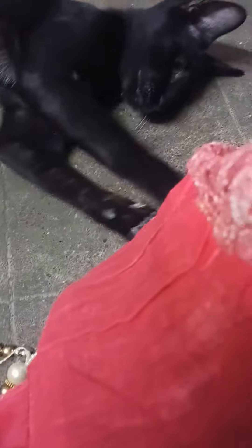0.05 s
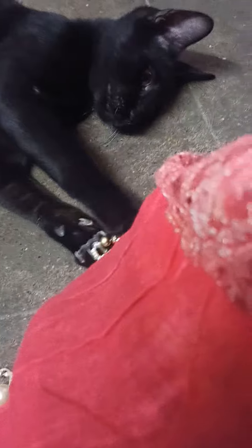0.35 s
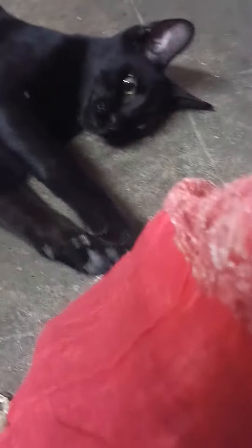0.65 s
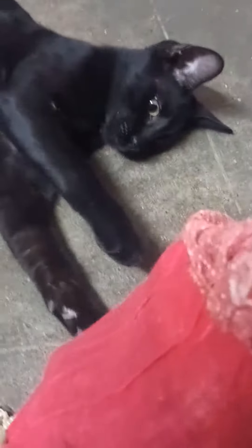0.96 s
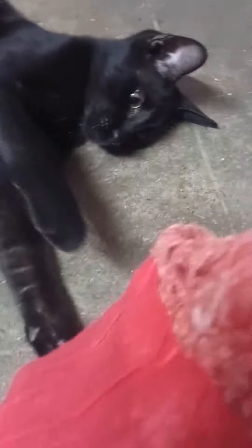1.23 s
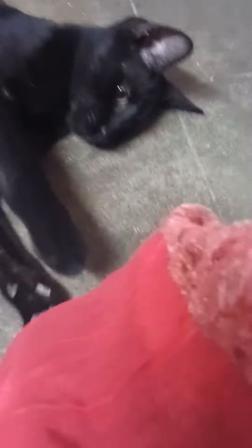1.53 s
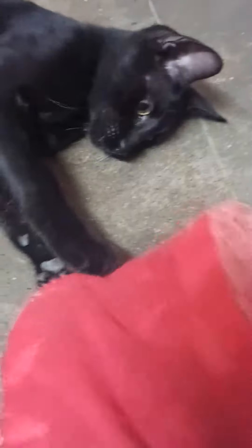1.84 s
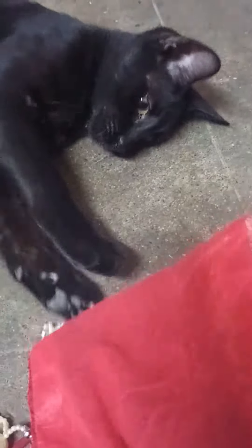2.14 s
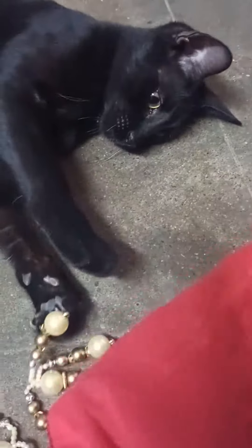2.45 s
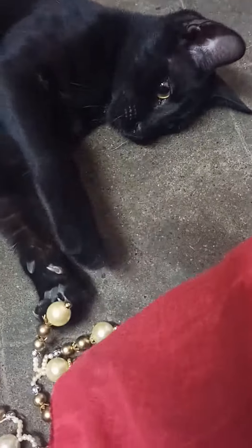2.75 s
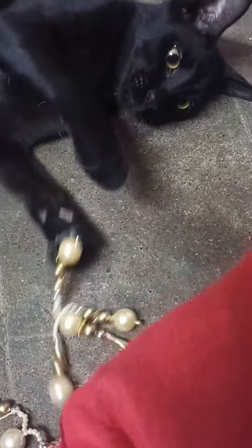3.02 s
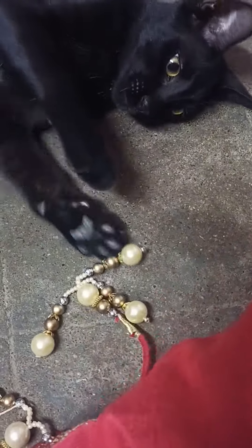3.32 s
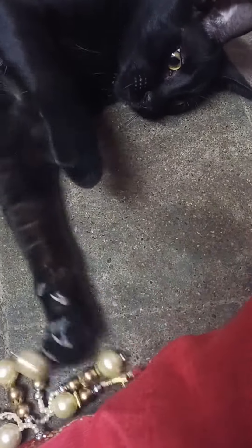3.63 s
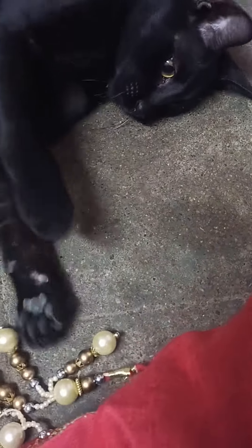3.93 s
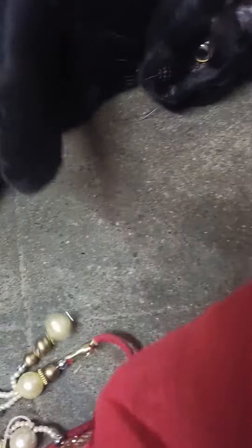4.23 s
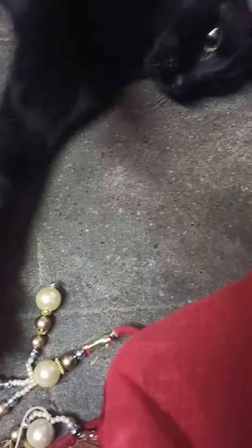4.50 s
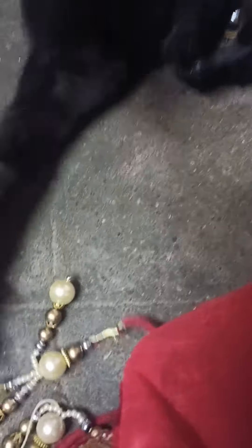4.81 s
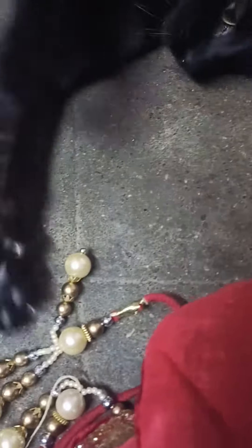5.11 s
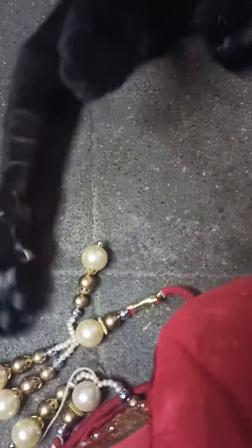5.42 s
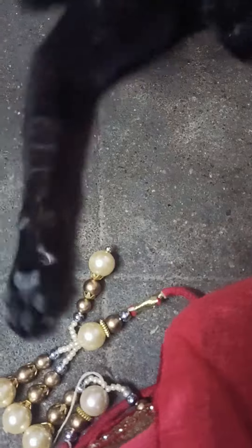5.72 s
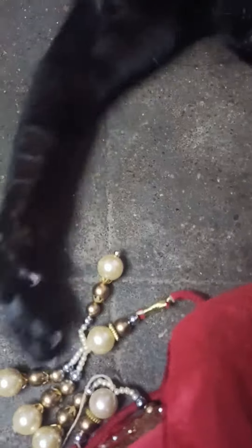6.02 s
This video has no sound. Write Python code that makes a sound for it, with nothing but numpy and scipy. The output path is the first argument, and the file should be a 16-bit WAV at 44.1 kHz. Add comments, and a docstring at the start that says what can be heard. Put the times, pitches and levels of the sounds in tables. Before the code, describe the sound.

A cat paws a beaded tassel on a stone floor, close to the microphone. Two tiny metal bells give short, high, slightly buzzing chinks at the very start, around 0.4 seconds and faintly at 0.9. Beads slide with a fine gritty scrape and click sharply together near 1.3 seconds, followed by the brightest jingles at 1.4 and 1.8 and a faint one at 2.3. After a lull, a flurry of small dry bead clicks and short drags runs from about 3.1 to 4.5 seconds, strongest near 3.5, 3.8 and 4.2, with one very faint bell touch at 4.4. Single clicks follow near 4.9 and 5.6, and a last click and slide at 6.2. Throughout, a ceiling fan rumbles and hums softly. Its faint ticking, about five a second, and a soft high hiss come up at around 1.4 seconds. The room adds only a slight, short echo.

```python
"""Two tiny metal bells jingle and beads click and slide as a cat paws a tassel on a stone floor, close by.
A loose pellet strikes each bell's shell and buzzes against it. The beads knock on the stone and on
each other, and catch on grit as they drag. Behind them a ceiling fan rumbles and ticks faintly once
a turn, under a soft hiss. Ticks and hiss are faint at first and come up at about 1.4 s."""
import sys
import numpy as np
from scipy import signal
from scipy.fft import rfft, irfft
from scipy.io import wavfile

SR = 44100
rng = np.random.default_rng(int(sys.argv[2]) if len(sys.argv) > 2 else 0)


def to_wav(sig):
    """Store sig (one row per channel, or 1-D mono) as 16-bit WAV at the path in sys.argv[1].

    Samples outside -1..1 are clipped; the rate is SR.
    """
    pcm = np.clip(np.atleast_2d(sig), -1, 1) * 32767
    pcm = np.round(pcm).astype(np.int16)
    wavfile.write(sys.argv[1], SR, pcm.T)  # frames by channels


N = 276066
T = np.arange(N) / SR
BINS_HZ = np.arange(N // 2 + 1) * SR / N

# Shell modes: (frequency [Hz], level [dB], t60 [s], twin weight [signed by shape in a split pair])
FIRST_BELL_MODES = [(4093, 0.5, 0.078, -0.61), (4460, -11.5, 0.17, -0.47), (5270, 1, 0.041, 0.34),
                    (7810, -0.5, 0.058, -1.14), (8590, -0.5, 0.061, 1), (9860, -14, 0.037, 0),
                    (12400, -9, 0.06, 0.49), (13430, -9, .03, 0), (13620, -1, 0.05, -0.099),
                    (15200, -13, 0.0304, 0.046)]
SECOND_BELL_MODES = [(4040, -3, 0.11, -0.13), (4590, 2.5, 0.041, -0.34), (7890, 3, 0.041, -1.1),
                     (8200, 4.5, 0.019, 1), (11500, 2, .006, 0), (13000, -4, .03, 0), (13900, -9, .025, 0),
                     (14230, 3.5, 0.026, 0)]
# Pellet strikes: (time [s], low force [dB], mid force [dB], top force [dB], twin bias [dB])
FIRST_BELL_STRIKES = [(.0073, -27, -33.5, -19, 8), (.0155, -32, -26, -15.5, -1), (.3717, -49, -54, -38, -8),
                      (.3775, -32, -18, -15, 3.5), (.3943, -28.5, -28, -16.5, 7.5),
                      (.422, -55, -35.5, -36, 5), (.8086, -59, -45, -41, 8), (.9293, -41, -33, -20, 2.5),
                      (1.3743, -33, -30.5, -26, -8), (1.388, -37, -19.5, -6, -2),
                      (1.398, -33.5, -25, -16, -4.5), (1.4656, -54, -48, -31.5, 0),
                      (4.4154, -56, -45.5, -55, 0.5)]
SECOND_BELL_STRIKES = [(1.39, -31, -21, -35, 1), (1.7879, -31.5, -12, -14.5, 1),
                       (1.7947, -35, -24, -28, -5), (1.8145, -58, -29, -26, 1), (1.821, -50, -25, -24.5, 1),
                       (2.3096, -52, -39.5, -40, -3.5)]


def bell(modes, strikes, scatter_db, crack_db, crack_s, rattle_db, rattle_s):
    """A loose pellet cracks against the shell and buzzes on; where it lands decides which modes ring."""
    out = np.zeros(N)
    hz, mode_db, t60_s, twin = np.transpose(modes)
    t = T[:SR // 25]
    swing_up = 1 - np.exp(-T[:SR // 5] / 0.00013)
    for time_s, low_db, mid_db, top_db, bias_db in strikes:
        force_db = np.interp(hz, [5300, 7800, 8600, 12500], [low_db, mid_db, mid_db, top_db])
        gains = from_db(force_db + mode_db + twin * bias_db + scatter_db * rng.standard_normal(len(hz)))
        chink = swing_up * ringing(hz, gains, t60_s)
        touches = rng.standard_normal(len(t)) ** 3 * np.exp(-t / rattle_s)
        touches *= from_db(rattle_db) / np.linalg.norm(touches)
        touches[0] = 1   # the strike itself
        add(out, time_s, signal.fftconvolve(chink, touches))
        crack = np.diff(rng.standard_normal(len(t) + 2), 2) * np.exp(-t / crack_s)
        add(out, time_s, from_db(crack_db) * np.linalg.norm(gains) * crack)
    return high_pass(out, 4360)


# Dead ring of a bead on stone: (frequency [Hz], level [dB], t60 [s])
BEAD_MODES = [(3310, 5, 0.0021), (4830, 1, 0.0046), (5850, 4.5, 0.0022), (7380, 4, 0.0026),
              (8360, 1, 0.0037), (11200, 10, 0.005), (13500, 18.5, 0.0027)]
# Bead impacts: (time [s], level [dB], click centre [Hz], gain of modes above 10 kHz [dB])
BEAD_KNOCKS = [(0.6569, -32, 7070, -11), (0.7891, -34, 6900, -12), (1.2471, -15, 7000, -16),
               (1.2548, -15.5, 7000, -26), (1.2644, -25, 7450, -16), (1.303, -18, 7800, -21),
               (1.5688, -24.5, 7150, -23), (1.95, -27, 7400, -27), (3.0994, -29.5, 7000, -29),
               (3.2511, -21.5, 4760, -21), (3.2695, -30, 7100, -17), (3.472, -14, 8600, -20),
               (3.4864, -27, 7160, -29), (3.5344, -26, 7000, -20), (3.5553, -27, 5330, -29),
               (3.6104, -28, 5450, -10), (3.6299, -25.5, 7370, -6), (3.7507, -17, 7750, -22),
               (3.7783, -23, 5250, -24), (3.8084, -29, 7470, -20), (4.1654, -22.5, 7880, -14),
               (4.1879, -22, 8040, -20), (4.275, -30, 4840, -20), (4.8732, -28.5, 7090, -21),
               (5.6486, -27.5, 7470, -15), (6.1572, -23, 5700, -23)]


def bead_knocks(knocks, width_octaves, detune, chatter_db, chatter_s):
    """Each bead rings a little differently for milliseconds; its neighbours on the string chatter."""
    out = np.zeros(N)
    hz, mode_db, t60_s = np.transpose(BEAD_MODES)
    t = T[:SR // 25]
    for time_s, level_db, centre_hz, treble_db in knocks:
        gains = from_db(mode_db + (hz > 10000) * treble_db)
        gains /= 1 + (np.log2(hz / centre_hz) / width_octaves) ** 2
        detuned_hz = hz * (1 + detune * rng.standard_normal(len(hz)))
        click = ringing(detuned_hz, gains, t60_s)
        contacts = from_db(chatter_db) * rng.standard_normal(len(t)) ** 3 * np.exp(-t / chatter_s)
        contacts[0] = 1
        add(out, time_s, from_db(level_db) * signal.fftconvolve(click / np.abs(click).max(), contacts))
    return high_pass(out, 1400)


# Paw drags: (time of full speed [s], level [dB], rise [s], fall [s])
SLIDES = [(0.496, -47.5, 0.029, 0.042), (0.821, -44, 0.14, 0.18), (1.252, -40, .08, .08),
          (1.56, -48.5, .25, 0.53), (2.26, -51, 0.23, 0.18), (3.265, -45, 0.039, 0.075),
          (3.485, -46.5, .035, 0.087), (3.59, -49.5, 0.091, .15), (3.795, -44.5, 0.064, .07),
          (4.185, -42, 0.041, .14), (4.28, -48, .08, .12), (4.49, -51, 0.025, 0.043),
          (6.194, -49.5, 0.086, .15)]


def bead_motion(stir_db, fade_db):
    """Rubbing strength: slides swell and fade by fade_db per rise or fall time, over a faint stir."""
    power = from_db(stir_db) ** 2
    for time_s, level_db, rise_s, fall_s in SLIDES:
        away = np.maximum((time_s - T) / rise_s, (T - time_s) / fall_s)
        power = power + from_db(level_db - fade_db * np.minimum(away, 10)) ** 2
    return np.sqrt(power)


def bead_bumps(motion, peak_per_s, over_db, spread_db, low_hz, high_hz, treble_db, max_count):
    """Sliding beads collide at random, more often and harder with speed; rows as in BEAD_KNOCKS."""
    bumps_due = np.cumsum(motion / motion.max()) * peak_per_s / SR
    bumps = []
    for number, (delay, force, pitch) in enumerate(rng.random((max_count, 3))):
        at = np.searchsorted(bumps_due, number + delay)
        if at < N:
            level_db = 20 * np.log10(motion[at]) + over_db + spread_db * (2 * force - 1)
            centre_hz = low_hz * (high_hz / low_hz) ** pitch
            bumps.append((T[at], level_db, centre_hz, treble_db))
    return bumps


# Beads rubbing on stone: (frequency [Hz], relative level [dB])
DRAG_SPECTRUM = [(1500, -10.5), (3000, -7), (4800, 0), (6400, -2), (8000, -0.5), (9800, -12), (12000, -10),
                 (15500, -7.5)]


def bead_drag(motion, grains_per_s, spread_db):
    """Sliding beads catch on the floor's grit in dense tiny clicks."""
    sizes = from_db(spread_db * np.minimum(rng.exponential(1, N), 4))
    signs = rng.choice([-1, 1], N)
    catches = rng.random(N) < grains_per_s / SR
    return motion * coloured(sizes * signs * catches, DRAG_SPECTRUM)


# Fan rumble and air rush: (frequency [Hz], relative level [dB])
ROAR_SPECTRUM = [(25, -38), (42, -23.5), (58, -13.5), (72, -16.5), (105, -3.5), (150, -2), (240, 0),
                 (330, -4.5), (420, -9.5), (590, -5.5), (760, -15), (1100, -20.5)]
AIR_SPECTRUM = [(600, -0.5), (1100, -6.5), (1350, 4), (1550, 0.5), (1780, 2.5), (2100, -3.5), (2600, -3.5),
                (3200, -8), (4000, -9), (6300, -17), (8200, -35), (10000, -38), (14000, -16.5),
                (15400, -18)]
# Drift of the air rush: (time [s], relative level [dB])
AIR_ENVELOPE = [(0.0, -54.5), (1.27, -52), (4.83, -50.5), (6.26, -51)]
# Fan hum: (centre [Hz], width [Hz], rms level [dB])
HUM_BANDS = [(135.3, 9.5, -49.5), (193.7, 1.5, -52.5), (226.7, 24, -50), (353, 12.6, -57)]


def fan(roar_db, air_gain_db):
    """The ceiling fan makes a low roar, a rush of air and narrow humming bands."""
    out = from_db(roar_db) * noise(ROAR_SPECTRUM)
    out += from_db(air_gain_db) * envelope(AIR_ENVELOPE) * noise(AIR_SPECTRUM)
    for centre_hz, width_hz, hum_db in HUM_BANDS:
        band = rfft(rng.standard_normal(N)) / (1 + ((BINS_HZ - centre_hz) / width_hz * 2) ** 2)
        out += from_db(hum_db) * unit_rms(irfft(band, N))
    return out


# Fan scrape: (frequency [Hz], relative level [dB])
TICK_SPECTRUM = [(6000, -10), (7400, -3), (8600, -10.5), (10400, -24), (11200, -3.5), (11800, -11),
                 (12300, -7), (13000, -25), (14000, -9), (15500, -8.5)]


def fan_ticks(level_db, first_s, turn_s, width_s):
    """The fan scrapes softly once a turn."""
    from_tick_s = (T - first_s + turn_s / 2) % turn_s - turn_s / 2
    pulses = np.exp(-(from_tick_s / width_s) ** 2)
    return from_db(level_db) * pulses * noise(TICK_SPECTRUM)


# Hiss colour: (frequency [Hz], relative level [dB])
HISS_SPECTRUM = [(2500, -13), (4800, -7.5), (6400, -10.5), (7000, -2.5), (7400, 5), (7750, -3.5),
                 (8200, -4.5), (9000, -13.5), (10000, -29), (10700, -18), (11200, -11), (12800, -27),
                 (14200, -22), (15500, -19)]
# Hiss drift: (time [s], relative level [dB])
HISS_ENVELOPE = [(1.5, -49), (2.21, -53.5), (3.57, -55), (3.66, -54), (3.93, -67), (4.38, -55),
                 (4.64, -58.5), (6.26, -55)]


def hiss():
    """A soft, high hiss that wavers and dips briefly near 4 s."""
    return envelope(HISS_ENVELOPE) * noise(HISS_SPECTRUM)


def room(x, wet_db, t60_s, cutoff_hz):
    """Hard walls add a diffuse tail, its highest treble absorbed."""
    t = T[:SR // 2]
    tail = rng.standard_normal(len(t)) * np.exp(-np.log(1000) * t / t60_s) * (t > .008)
    absorption = signal.butter(4, cutoff_hz, fs=SR, output="sos")
    tail = signal.sosfilt(absorption, tail / np.linalg.norm(tail))
    return x + from_db(wet_db) * signal.fftconvolve(x, tail)[:N]


def ringing(hz, gains, t60_s):
    """0.2 s of decaying modes, struck together with alternating polarity."""
    t = T[:SR // 5, None]
    signs = (-1) ** np.arange(len(hz))
    return (signs * gains * np.sin(2 * np.pi * hz * t) * np.exp(-np.log(1000) * t / t60_s)).sum(axis=1)


def high_pass(x, hz):
    """Small things radiate no bass."""
    return signal.sosfilt(signal.butter(2, hz, "high", fs=SR, output="sos"), x)


def coloured(x, spectrum):
    """Shape by (frequency [Hz], level [dB]) rows, falling 24 dB/octave beyond them; unit rms."""
    octave = np.log2(np.maximum(BINS_HZ, 1))
    hz, db = np.transpose(spectrum)
    octaves_outside = np.abs(octave - np.clip(octave, np.log2(hz[0]), np.log2(hz[-1])))
    gain_db = np.interp(octave, np.log2(hz), db) - 24 * octaves_outside
    return unit_rms(irfft(rfft(x) * from_db(gain_db), N))


def noise(spectrum):
    """Coloured Gaussian noise at unit rms."""
    return coloured(rng.standard_normal(N), spectrum)


def envelope(rows):
    """Gain from (time [s], level [dB]) rows."""
    return from_db(np.interp(T, *np.transpose(rows)))


def add(out, time_s, sound):
    """Mix a sound in at time_s."""
    start = max(round(time_s * SR), 0)
    out[start:start + len(sound)] += sound[:N - start]


def from_db(db):
    """Decibels to gain."""
    return 10 ** (np.asarray(db) / 20)


def unit_rms(x):
    """Scale to unit power."""
    return x / np.sqrt(np.mean(x ** 2) + 1e-20)


def scene():
    """Bells and beads close by, over the fan and the hiss."""
    treble_rise = envelope([(1.3, -14), (1.48, 0)])
    background = fan(roar_db=-39.5, air_gain_db=1.29)
    ticks = treble_rise * fan_ticks(level_db=-50, first_s=0.0185, turn_s=0.2033, width_s=0.0087)
    background += room(ticks, wet_db=-5, t60_s=0.2, cutoff_hz=13000)
    background += treble_rise * hiss()

    bells = bell(FIRST_BELL_MODES, FIRST_BELL_STRIKES, scatter_db=1,
                 crack_db=-18.5, crack_s=0.0022, rattle_db=-7, rattle_s=0.01)
    bells += bell(SECOND_BELL_MODES, SECOND_BELL_STRIKES, scatter_db=0.5,
                  crack_db=-20, crack_s=0.00076, rattle_db=-7, rattle_s=0.0071)
    bells = room(bells, wet_db=-31, t60_s=0.3, cutoff_hz=9000)

    motion = bead_motion(stir_db=-62, fade_db=21)
    beads = bead_drag(motion, grains_per_s=1400, spread_db=3.5)
    bumps = bead_bumps(motion, peak_per_s=79, over_db=14.5, spread_db=4,
                       low_hz=4300, high_hz=11000, treble_db=-17, max_count=120)
    beads += bead_knocks(list(BEAD_KNOCKS) + bumps, width_octaves=0.64, detune=0.039,
                         chatter_db=-34.5, chatter_s=0.0031)
    beads = room(beads, wet_db=-14, t60_s=0.21, cutoff_hz=10100)
    return (bells + beads + background)[None]


def record(dry):
    """Steep low-pass at 15.45 kHz."""
    return signal.sosfilt(signal.ellip(10, .2, 70, 15450, fs=SR, output="sos"), dry)


dry = scene()
out = record(dry)
to_wav(out)
```